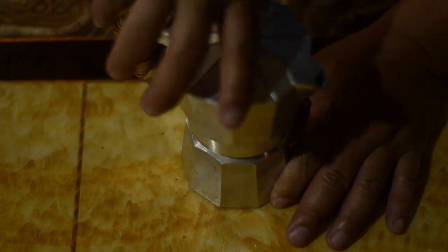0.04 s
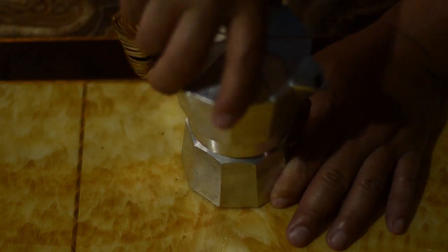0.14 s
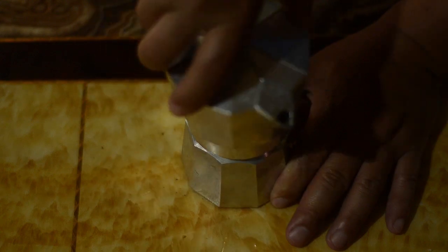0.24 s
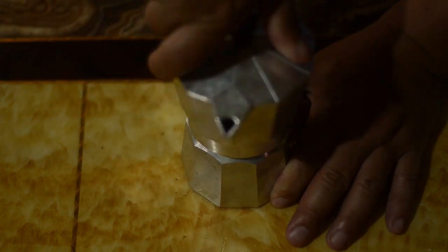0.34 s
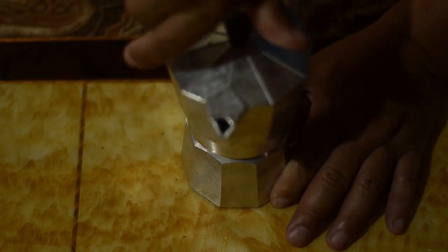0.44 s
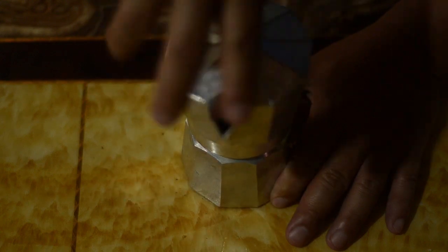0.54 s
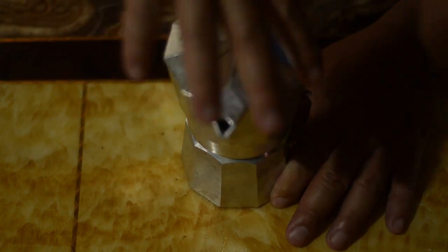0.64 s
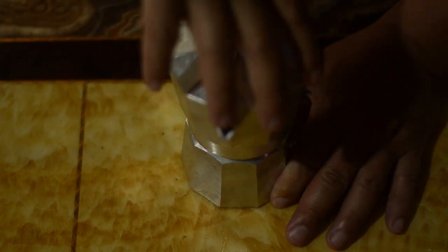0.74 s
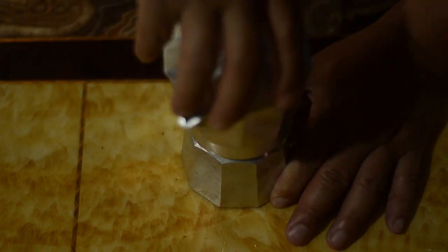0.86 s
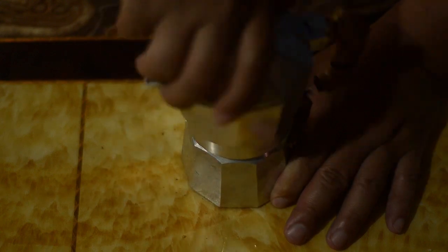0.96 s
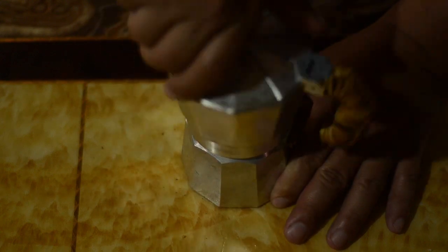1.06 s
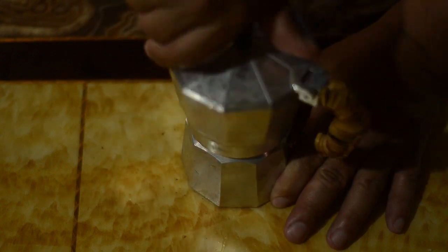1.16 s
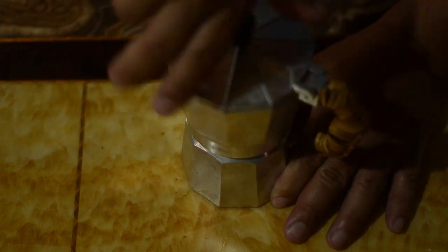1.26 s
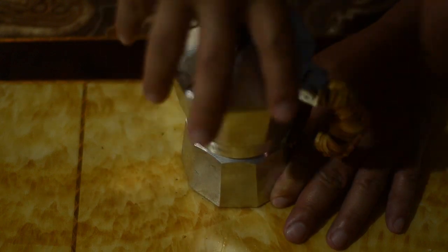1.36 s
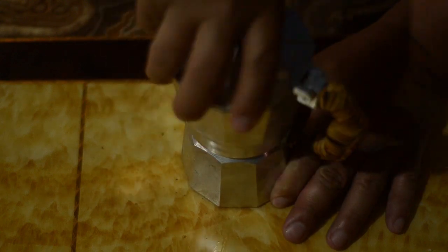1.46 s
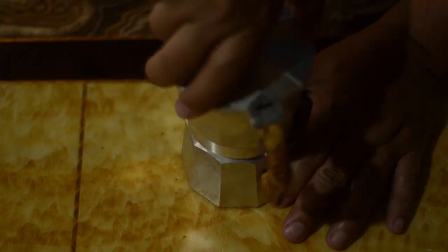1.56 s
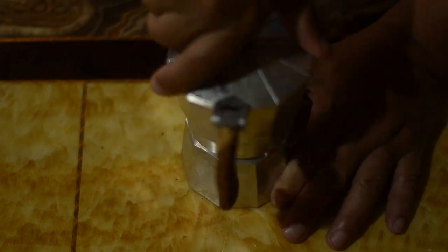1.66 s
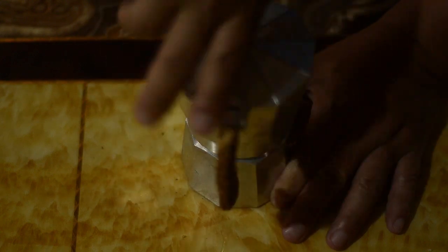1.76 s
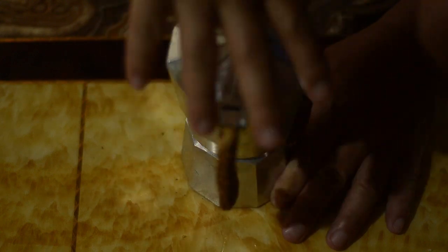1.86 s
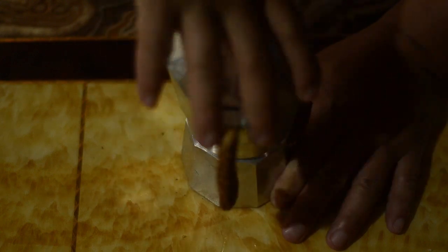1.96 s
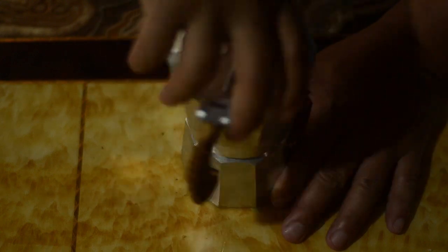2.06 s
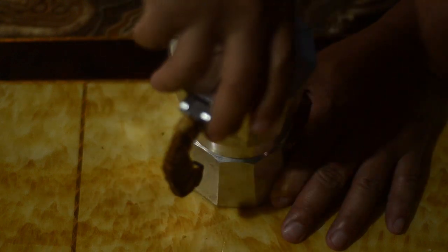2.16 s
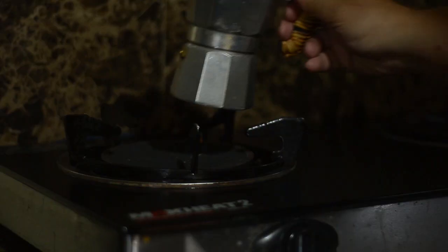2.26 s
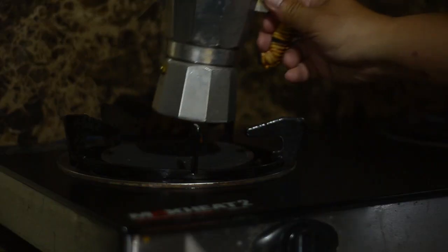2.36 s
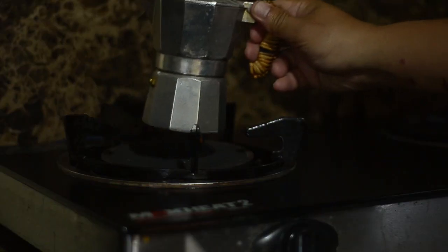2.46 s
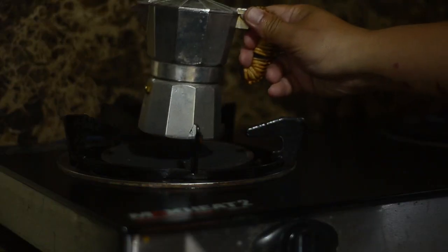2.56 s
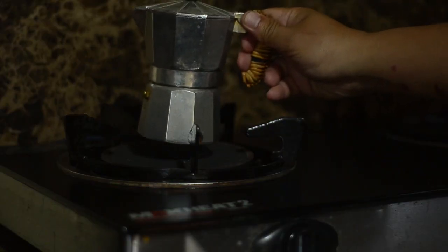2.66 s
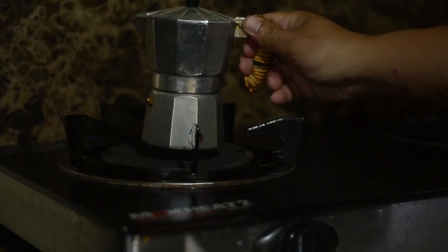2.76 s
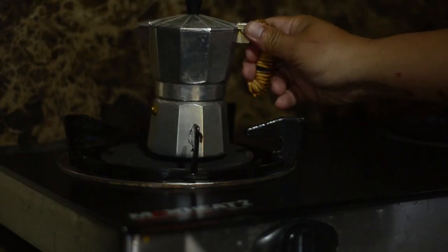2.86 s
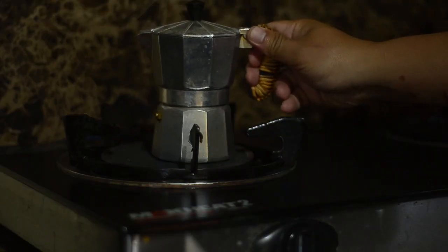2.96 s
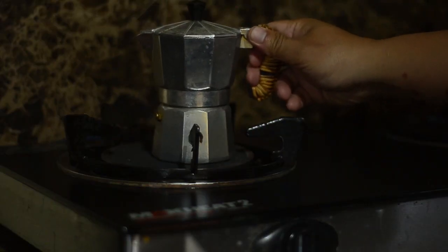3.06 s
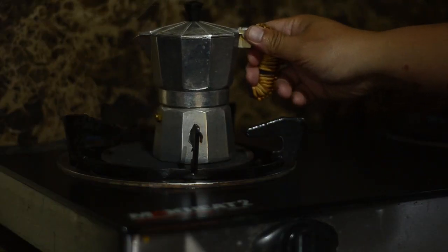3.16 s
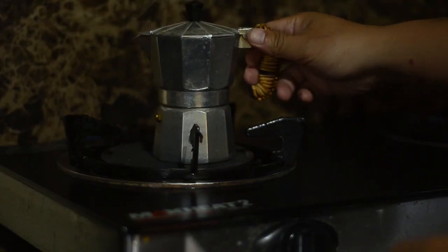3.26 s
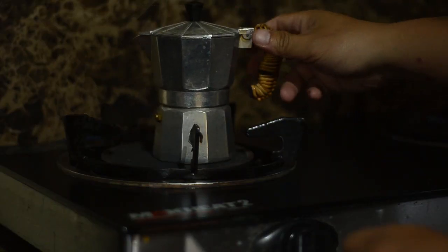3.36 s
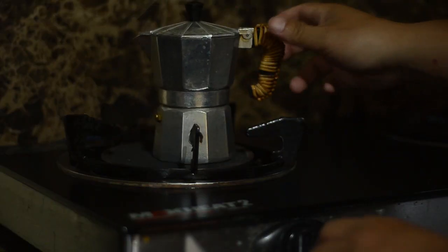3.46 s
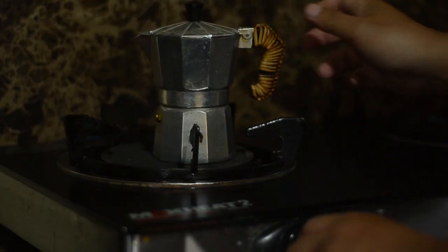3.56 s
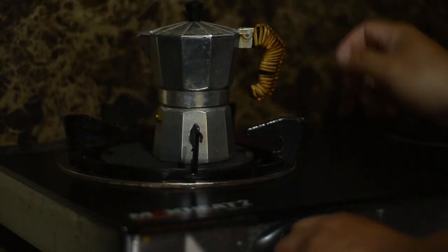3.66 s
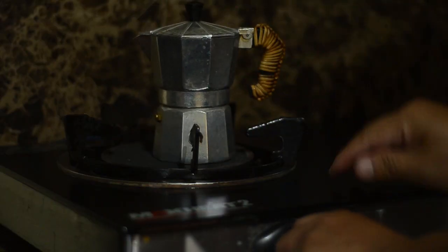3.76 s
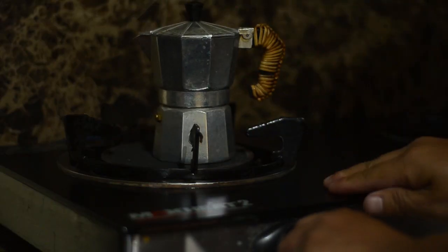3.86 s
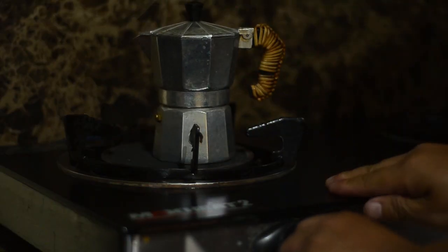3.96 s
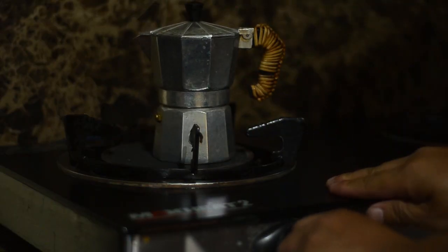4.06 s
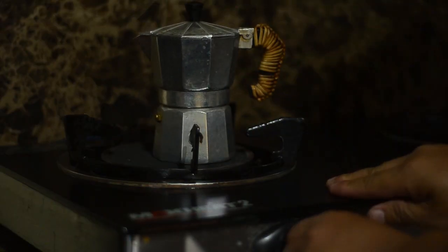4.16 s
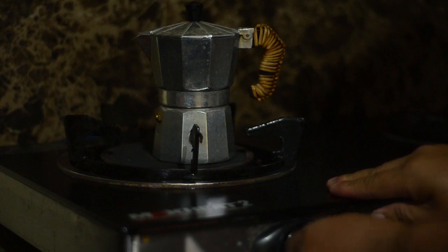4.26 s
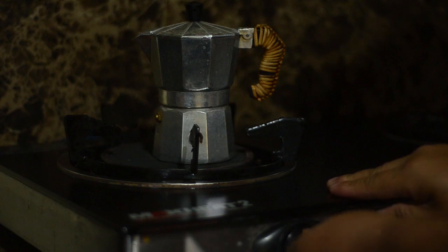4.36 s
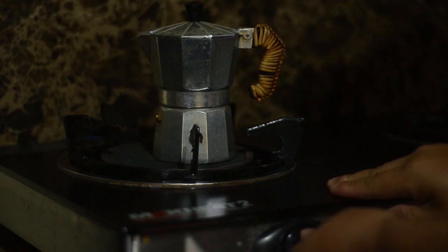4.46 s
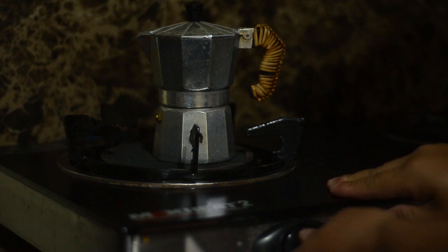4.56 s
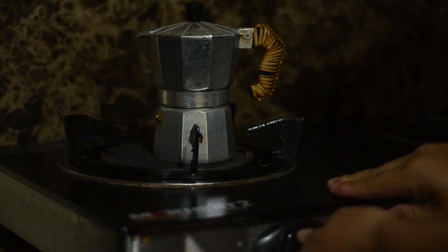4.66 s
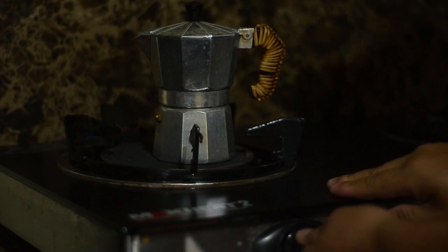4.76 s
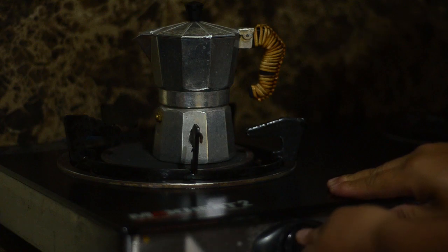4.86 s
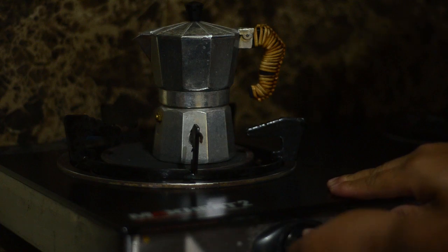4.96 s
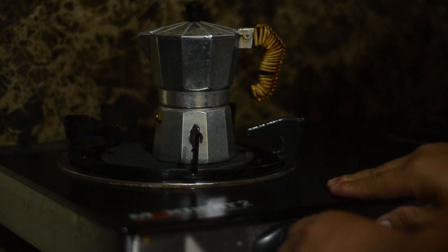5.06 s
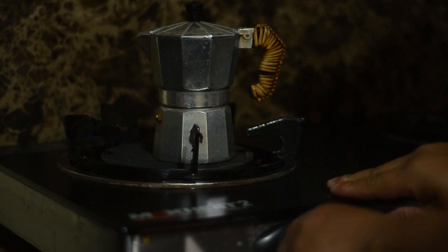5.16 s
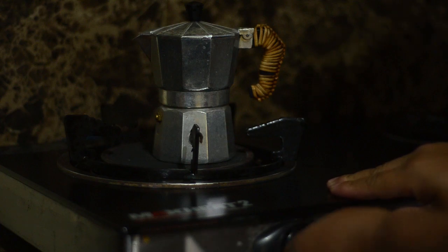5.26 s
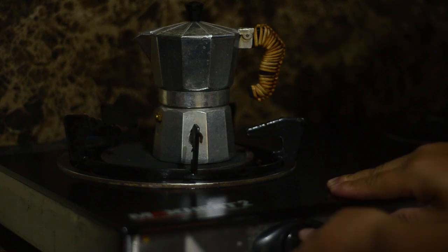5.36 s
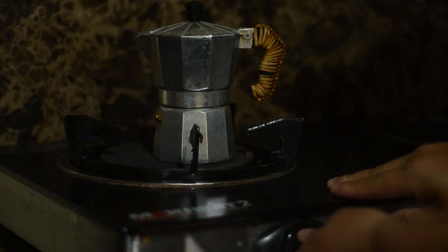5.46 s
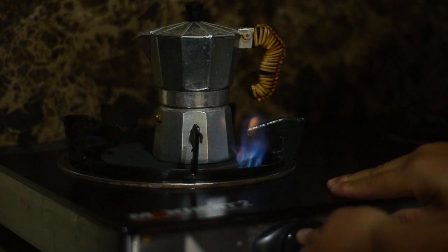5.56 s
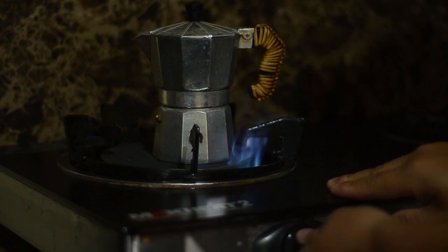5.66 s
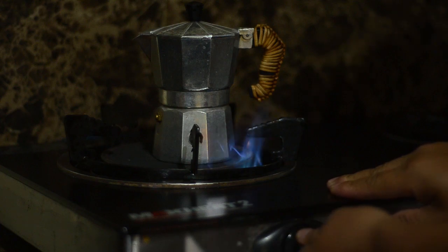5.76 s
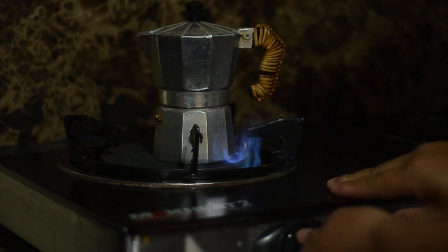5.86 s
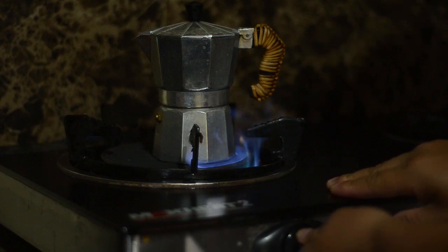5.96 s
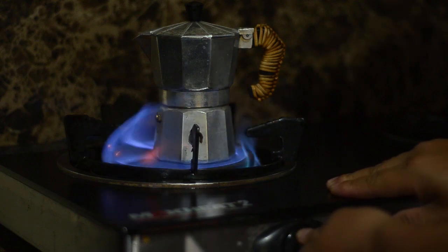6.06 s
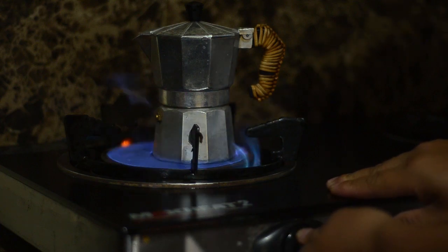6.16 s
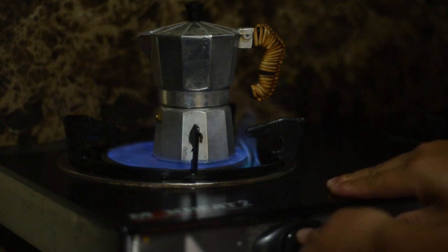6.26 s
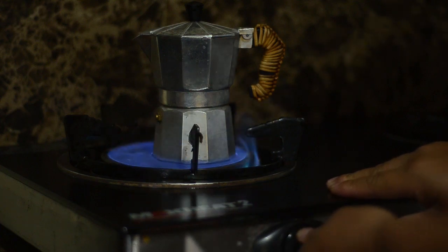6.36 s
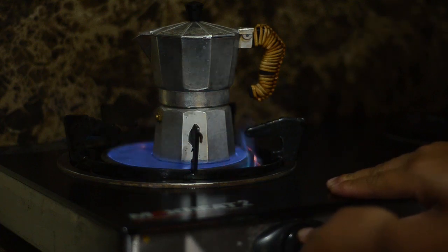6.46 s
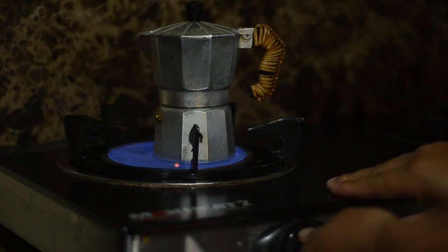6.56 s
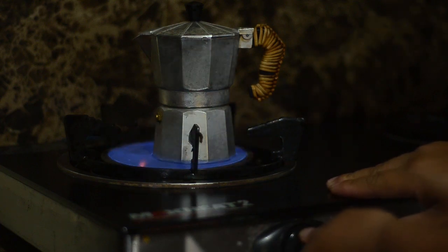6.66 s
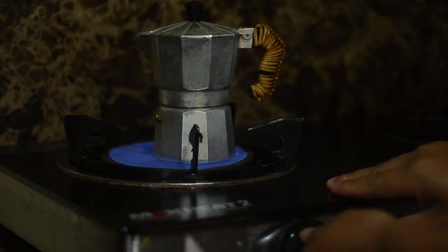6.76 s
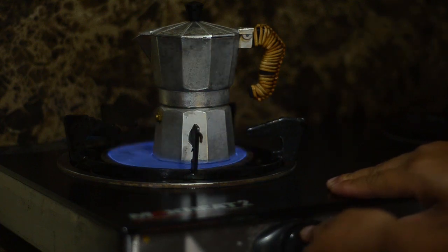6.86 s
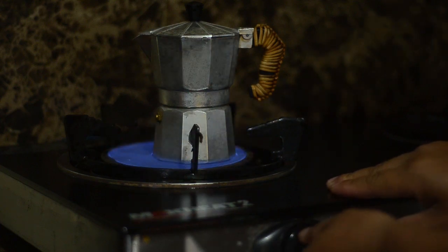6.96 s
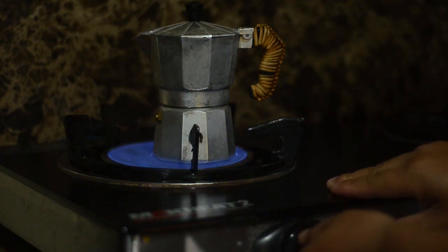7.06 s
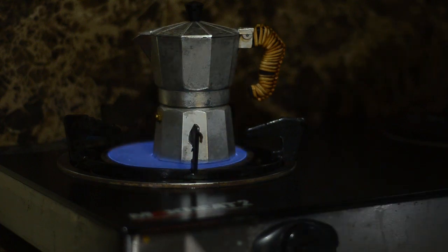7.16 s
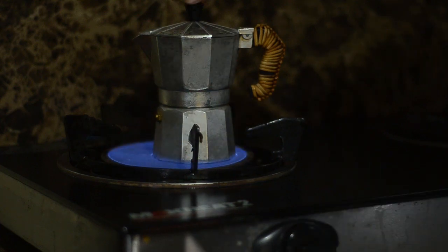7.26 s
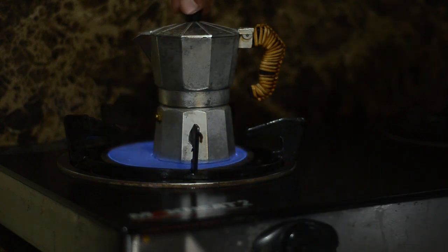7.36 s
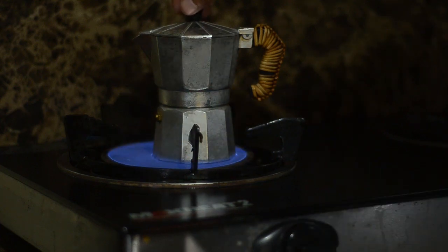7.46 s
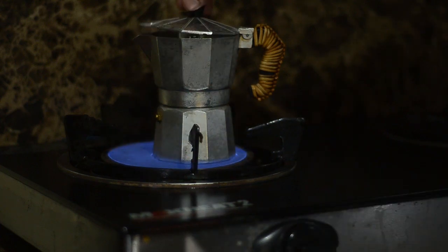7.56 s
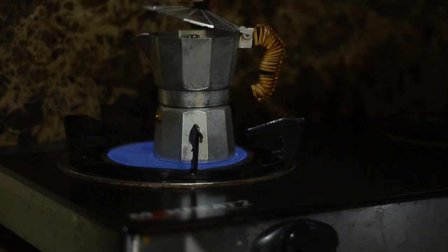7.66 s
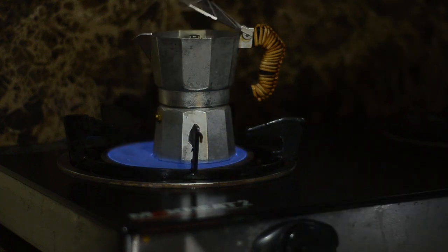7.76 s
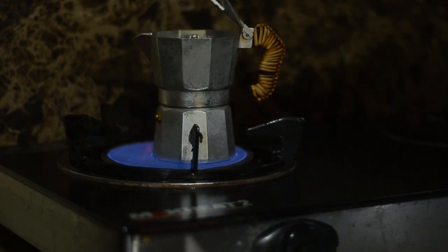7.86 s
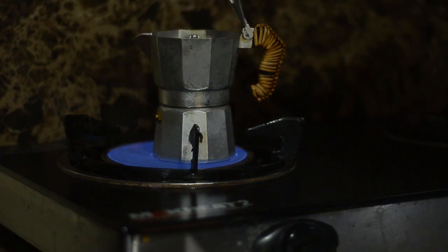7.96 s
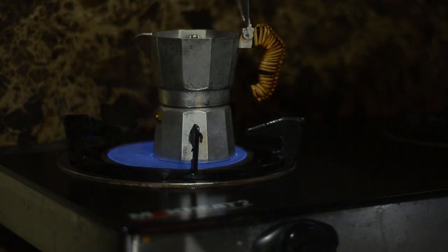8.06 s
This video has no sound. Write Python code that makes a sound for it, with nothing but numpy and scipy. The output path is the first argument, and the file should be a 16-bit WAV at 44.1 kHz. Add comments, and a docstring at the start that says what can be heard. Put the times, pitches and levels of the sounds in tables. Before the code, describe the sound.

Light metallic taps and short gritty scrapes as a metal coffee pot is screwed together, a soft thud on a stove grate, then two loud igniter snaps.

```python
"""A small hard kitchen: a metal coffee pot is screwed together on tiles, set on a stove grate, and the
stove knob is turned until the spring igniter snaps twice. Room hiss and a faint hum lie under it all.
Knocks, landing, clicks and snaps are chattering contacts, heard bare and through ringing metal;
the thread is a run of tiny slips on the damped pot. Sparse echoes ring on after each sound, and a
microphone cuts narrow dips, clips high peaks and limits the band."""
import sys
import numpy as np
from scipy import signal
from scipy.fft import rfft, irfft
from scipy.io import wavfile
from scipy.ndimage import uniform_filter1d

SR = 44100
rng = np.random.default_rng(int(sys.argv[2]) if len(sys.argv) > 2 else 0)


def dump_mix(stems):
    """Bounce the given channels to the path in sys.argv[1] as a 16-bit WAV at rate SR."""
    frames = np.atleast_2d(stems).T  # one column per channel
    limited = np.clip(frames, -1, 1)  # hard clip at full scale
    pcm = np.round(limited * 32767).astype(np.int16)
    wavfile.write(sys.argv[1], SR, pcm)


N = 357631  # length in samples

# Spectrum of the room hiss, relative: hz, level_db (per Hz)
HISS = [(20, -11.5), (50, -21.5), (100, -12.5), (200, -6), (400, -2), (800, -0.5), (1600, -1), (3000, -4),
        (5000, -8.5), (6400, -9.5), (8000, -14.5), (11000, -20.5), (14000, -24.5), (16000, -33)]
HISS_DB = -47  # rms of the whole hiss
# Faint steady hum: pitch_hz, level_db (rms)
HUM = [(32.3, -85.5)]

# The four blow tables share columns: start_s, contact_s, level_db (rms over 25 ms in the 1800-3500 Hz
# band), weight_db, brightness_db, edge_db (bands near 1300, 4500 and 8500 Hz against level_db),
# then two pitches that the touched spot favours: pitch_1_hz, pitch_2_hz.
# The halves of the pot knock; last, the handle is let go
TAPS = [(0.1415, 0.0023, -43, -9, 3.5, -5, 4250, 2857),
        (0.2458, 0.00578, -46, -10, -5.5, -14.5, 2300, 5370),
        (0.2632, 0.004315, -36, -21, -7, -29.5, 3650, 2170),
        (0.3576, 0.00232, -44, -19, -2, -10.5, 4900, 2541),
        (0.3691, 0.00826, -36.5, -19.5, -9, -21, 2550, 4273),
        (0.386, 0.00279, -41.5, -14.5, 2, -8.5, 6400, 9700),
        (0.4175, 0.0035, -32.5, -18.5, -1.5, -8, 2450, 6483),
        (0.7555, 0.002904, -39, -1.8543, 0.1173, -6, 1900, 4599),
        (0.828, 0.001455, -44, -2, 0.7026, -4.5, 6150, 3988),
        (1.0125, 0.00335, -53.5, -5.5, -7.5, -10, 2500, 1898),
        (1.0808, 0.00374, -42.5, -6.5, -7, -17.5, 2850, 5370),
        (1.1378, 0.00324, -45, -11, -7, -7.5, 3280, 6272),
        (1.4495, 0.00165, -43, 0.5, 1, 0.1779, 1900, 6190),
        (1.479, 0.003944, -46, -14.5, -1.29, -8, 4250, 2923),
        (1.546, .005, -46, 2.06, -2.5, -8.5, 1340, 2548),
        (1.6315, 0.00204, -50.5, -5.5, -13, -14, 3280, 2170),
        (1.6688, 0.001863, -43.5, -5, 0.5, -8, 1900, 4048),
        (1.959, 0.009075, -37.5, -3.5, 9.5, 1.5, 4345, 6538),
        (1.9715, 0.002562, -34.5, -17, -19.5, -21, 2850, 2530),
        (2.0214, 0.003447, -41, -13.5, -5.6, -14, 2530, 4334),
        (2.0908, 0.000683, -36, -9, -1.5, -3.5, 2500, 7124),
        (3.1455, 0.0036, -49.5, -21.5, -3.5, -3.5, 6300, 7750)]
# The full pot lands on the grate
LANDINGS = [(2.9755, 0.0036, -36, 10.096, 0.601, -19.5, 1502, 729.2)]
# The knob clicks over its stops
KNOB = [(4.0748, 0.003204, -52, 11.5, 5.5, -8, 1571, 4615), (4.2184, 0.00871, -54, -2, -7, -20, 1250, 1500),
        (5.0736, 0.00821, -49, 3, 4.1634, -9.5, 2905, 1500),
        (5.093, 0.004486, -43.5, -18, -14.5, -13, 2186, 11770),
        (5.1243, 0.0037, -35, -5, 4, 1.5, 4616, 8900), (5.251, 0.00594, -40.5, -5, -0.752, -17, 2154, 4908),
        (6.6766, 0.00065, -49, -11, -15.5, -24, 2250, 2508)]
# The spring igniter snaps
SNAPS = [(4.7008, 0.0050854, -16, -9.5, -3, -6.5, 1246, 635.6),
         (5.5178, .0057, -16.5, -8.5, -2, -6.5, 1223, 622.2)]

# Turns of the thread: start_s, length_s, level_db (rubbing, at the middle of the turn)
TURNS = [(0.219, 0.08864, -42.5), (0.353, 0.07436, -35.5), (0.848, 0.2122, -50.5), (1.09, 0.0745, -46.5),
         (1.487, 0.1653, -48.5), (1.981, 0.07117, -48.5)]
TURN_ENDS_DB = -15  # a turn swells from this, against its middle, and sinks back to it

# Ringing modes of each metal body: pitch_hz, level_db (relative), t60_s (held to 0.005-0.07 in use)
POT = [(660, -8, .04), (930, -8, .03), (1340, -6, .03), (1860, -4, .04), (2170, -4, .03), (2530, -4, .03),
       (2850, -4, .03), (3280, -5, .04), (3650, -5, .03), (4200, -7, .03), (4345, -6, .045),
       (4900, -8, .02), (5370, -7, .03), (6150, -7, .03), (6350, -7, .03), (6600, -7, .04), (7300, -9, .02),
       (7750, -9, .02), (8790, -10, .015), (9700, -10, .015)]
GRATE = [(561, -15, 0.0385), (744.41, 2, 0.02676), (855.8, -10, 0.01858), (1105.7, -23, 0.0296),
         (1244.6, -9.5, 0.0332), (1481.9, -11.5, 0.02605), (1564, 0, 0.0296), (1655.6, -4.5, 0.02392),
         (2077.8, 2.5, 0.01938), (2472.2, 5, 0.00695), (3038.3, -15.5, .03), (3384.5, 3.5, 0.01741),
         (4548, 0.5, 0.01212), (5144, -15, .02), (6716, 2, 0.02013)]
STOVE = [(635.56, -6, 0.15), (1303.9, -6.5, 0.05306), (1561.8, -3, 0.05), (1770.1, -6.5, 0.0545),
         (1996.9, -9.5, 0.0398), (2269, 7.5, 0.01311), (2577.4, -10.5, 0.0187), (3037.4, -3.5, 0.0472),
         (3214, -13.5, 0.0218), (3473, -2, 0.0361), (3746.4, -13.5, 0.042), (4535.6, -6.5, 0.038),
         (4848.8, -3.5, 0.02443), (5640, -4, 0.039), (6200, -11, 0.015), (6587, 16, 0.00441),
         (7394, -1, 0.01316), (7920, 5, 0.01785), (12300, -9.5, .015)]

# Bands that set the colour of a blow: from_hz, to_hz
OCTAVES = [(450, 900), (900, 1800), (1800, 3500), (3500, 6000), (6000, 12000)]
BODY_PER_WEIGHT = 0.3413  # the lowest band follows the weight by this share
USUAL_DB = -45  # blow level at which crack_db holds as given

# Decay of the kitchen echoes: hz, t60_s
KITCHEN = [(300, 0.6122), (700, 0.45254), (1500, 0.472), (3000, 0.4443), (6000, 0.3947), (9000, 0.3522),
           (12000, 0.20815), (15000, 0.26927)]
# Dips of the microphone port: pitch_hz, width_hz, level_db
PORT = [(5710, 420, -13), (6900, 170, -13), (15020, 600, -9)]
EDGE_HZ = 15790  # upper band limit


def amp(db):
    """Decibels to amplitude."""
    return 10 ** (np.asarray(db) / 20)


def evened(x):
    """Scale to an rms of 1."""
    return x / np.sqrt(np.mean(x ** 2) + 1e-20)


def read(points, hz):
    """Read a curve of (hz, value) points along log frequency."""
    point_hz, value = np.transpose(points)
    return np.interp(np.log(hz + 1), np.log(point_hz + 1), value)


def add(mix, start_s, sound):
    """Lay a sound into the mix, cut at the end of the mix."""
    part = mix[round(start_s * SR):][:len(sound)]
    part += sound[:len(part)]


def hiss(patchy_db, swell_db):
    """Random short-time spectra, nearly smooth, with faint patches and a slow swell."""
    frames, hz = N // 512 + 5, np.fft.rfftfreq(2048, 1 / SR)
    real, imag, patches = rng.standard_normal((frames, 1025, 3)).T
    swell = evened(uniform_filter1d(patches[0], size=20))
    patches = uniform_filter1d(patches, size=24, axis=0)  # along frequency
    patches = evened(uniform_filter1d(patches, size=6, axis=1))  # along time
    level_db = read(HISS, hz)[:, None] + patchy_db * patches + swell_db * swell
    spectra = (real + 1j * imag) * amp(level_db)
    noise = signal.istft(spectra, nperseg=2048, noverlap=1536)[1][:N]
    return amp(HISS_DB) * evened(noise)


def hum():
    """Steady sines at the hum pitches."""
    t = np.arange(N) / SR
    return sum(amp(db) * np.sqrt(2) * np.sin(2 * np.pi * hz * t) for hz, db in HUM)


def chatter(contact_s, rise, size):
    """A burst of contacts with an even spectrum: swells over a share of the contact time, then dies."""
    u = np.arange(1, size + 1) / SR / max(contact_s, 1e-4)
    fade = (1 - np.exp(-u / rise)) * np.exp(-u)
    burst = rng.standard_normal(size) * fade
    for _ in range(6):  # level the spectrum, then pull the burst back under its fade
        spectrum = rfft(burst)
        burst = irfft(spectrum / (abs(spectrum) + 1e-12), size)
        eighth_peak = np.sort(abs(burst))[-8]
        burst = np.clip(fade.max() * burst / eighth_peak, -fade, fade)
    return burst


def ringing(modes, size, favoured_hz, favour_db):
    """Dying sines; the spot that is touched favours the modes near one or two pitches."""
    hz, db, t60 = np.transpose(modes)[:, :, None]
    t = np.arange(size) / SR
    spot_db = 3 * rng.standard_normal(hz.shape)
    nearness = np.exp(-(np.log(hz / np.array(favoured_hz)) / .05) ** 2)
    spot_db += favour_db * nearness.max(1, keepdims=True)
    t60 = np.clip(t60, .005, .07)  # hands and contents damp every ring
    return (amp(db + spot_db - 60 * t / t60) * np.sin(2 * np.pi * hz * t)).sum(0)


def coloured(x, points):
    """A causal filter through (hz, level_db) points: phase from the log gain."""
    log_gain = np.log(amp(read(points, abs(np.fft.fftfreq(1024, 1 / SR)))))
    response = np.exp(np.conj(signal.hilbert(log_gain)))
    impulse = np.fft.ifft(response).real[:512]
    return signal.oaconvolve(x, impulse)[:len(x)]


def octave_db(x):
    """Level of each band in OCTAVES as rms over 25 ms."""
    power = abs(rfft(x)) ** 2 * 2 / len(x) / (SR / 40)
    hz = np.fft.rfftfreq(len(x), 1 / SR)
    return np.array([10 * np.log10(power[(hz > lo) & (hz < hi)].sum() + 1e-20) for lo, hi in OCTAVES])


def blows(table, modes, rise, favour_db, thump_db, top_db, crack_db, body_db, crack_per_db=0):
    """Each blow is a short chatter of contacts: heard bare as a crack, and through the modes.

    crack_db sets crack over ring, crack_per_db adds to it for each dB of level above USUAL_DB;
    body_db is the band near 650 Hz for a blow of weight 0; thump_db and top_db tilt the extremes."""
    out, size = np.zeros(N), 4096
    centres_hz = np.sqrt(np.prod(OCTAVES, 1))
    for start_s, contact_s, db, weight_db, bright_db, edge_db, *favoured_hz in table:
        crack = chatter(contact_s, rise, size)
        ring = signal.fftconvolve(crack, ringing(modes, size, favoured_hz, favour_db))[:size]
        crack_gain = amp(crack_db + crack_per_db * (db - USUAL_DB))
        sound = evened(ring) + crack_gain * evened(crack)

        wanted_db = np.array([body_db + BODY_PER_WEIGHT * weight_db, weight_db, 0, bright_db, edge_db])
        lift = wanted_db - octave_db(sound)
        low, high = lift[0], lift[-1] + top_db
        colour = [(40, low + thump_db), (200, low - 22), (450, low - 9)]
        colour += list(zip(centres_hz, lift))
        colour += [(12000, high), (16000, high - 18)]
        sound = coloured(sound, colour)
        add(out, start_s, amp(db - octave_db(sound)[2]) * sound)
    return out


def pot_taps():
    """The halves of the pot knock: quick-rising contacts ring the pot, harder ones crack more."""
    return blows(TAPS, POT, rise=.06, favour_db=9, thump_db=-25, top_db=-9,
                 crack_db=0.5, body_db=-12.5, crack_per_db=0.6741)


def thread(slips_per_s, spread_db):
    """The thread catches and slips: uneven tiny clicks ring the damped pot."""
    out = np.zeros(N)
    colour = [(100, -46), (400, -11), (1000, 1), (2500, -3), (4500, -9.0), (8000, -16)]
    for start_s, length_s, db in TURNS:
        u = np.arange(0, length_s, 1 / SR) / length_s  # 0 to 1 through the turn
        chance, strength = rng.random(len(u)), rng.exponential(1, len(u))
        slips = (chance < slips_per_s / SR) * amp(spread_db * np.minimum(strength, 3))
        damping = np.exp(-np.arange(2048) / SR / .002)  # fingers damp the pot
        body = ringing(POT, 2048, [2500], 6) * damping
        rubbed = coloured(signal.fftconvolve(slips, body)[:len(u)], colour)
        swell = amp(db + TURN_ENDS_DB * (2 * u - 1) ** 2)
        add(out, start_s, swell * evened(rubbed) * signal.windows.tukey(len(u), .2))
    return out


def pot_landing():
    """The full pot lands: a slower-rising contact with a strong body rings the grate."""
    return blows(LANDINGS, GRATE, rise=0.41, favour_db=7.5, thump_db=-36.5, top_db=-10.5,
                 crack_db=4, body_db=-1)


def knob_clicks():
    """The knob clicks over its stops: small contacts, more crack than ring, through the stove."""
    return blows(KNOB, STOVE, rise=.3, favour_db=10.5, thump_db=-24, top_db=-4,
                 crack_db=7, body_db=-15, crack_per_db=.7)


def igniter_snaps():
    """The spring igniter snaps: loud contacts, mostly bare crack, ring the stove."""
    return blows(SNAPS, STOVE, rise=0.09957, favour_db=5.5, thump_db=-27.5, top_db=-8,
                 crack_db=9.5, body_db=-13)


def kitchen(x, wet_db, first_s, near_db):
    """Sparse echoes of random sign, each band dying at its own speed; nearby walls strengthen the start."""
    echoes = np.zeros(SR)
    at = np.arange(0, SR - 16, 16)  # one echo in every 16 samples
    echoes[at + rng.integers(0, 16, len(at))] = rng.choice([-1., 1.], len(at))
    hz, t, spectra = signal.stft(echoes, SR, nperseg=256)
    decay = amp(-60 * t / read(KITCHEN, hz)[:, None])
    tail = signal.istft(spectra * decay, SR, nperseg=256)[1][:SR]
    t = np.arange(SR) / SR
    onset = 1 - np.exp(-(t / first_s) ** 2)
    tail *= onset * amp(near_db * np.exp(-t / 0.0205))
    return x + amp(wet_db) * signal.fftconvolve(x, tail / np.linalg.norm(tail))[:N]


def scene():
    """Pot sounds in hand and sounds on the stove each get their own echoes, over hiss and hum."""
    room = hiss(patchy_db=.3, swell_db=.15) + hum()
    assembling = pot_taps() + thread(slips_per_s=2000, spread_db=2.5)
    in_hand = kitchen(assembling, wet_db=0.0, first_s=0.001965, near_db=5.5)
    stove_sounds = pot_landing() + knob_clicks() + igniter_snaps()
    on_stove = kitchen(stove_sounds, wet_db=3.0, first_s=0.0019234, near_db=6)
    return (in_hand + on_stove + room)[None]


def record(dry):
    """The microphone port cuts narrow dips, peaks beyond 0.95 are clipped, then the band limit."""
    for hz, width_hz, db in PORT:
        w, a = 2 * np.pi * hz / SR, amp(db / 2)
        q = np.sin(w) * width_hz / hz / 2
        zeros = [1 + q * a, -2 * np.cos(w), 1 - q * a]
        poles = [1 + q / a, -2 * np.cos(w), 1 - q / a]
        dry = signal.lfilter(zeros, poles, dry)
    held = np.clip(dry, -.95, .95)
    lowpass = signal.firwin(511, EDGE_HZ, window=("kaiser", 9), fs=SR)
    return signal.oaconvolve(held, lowpass[None], "same")


dry = scene()
out = record(dry)
dump_mix(out)
```